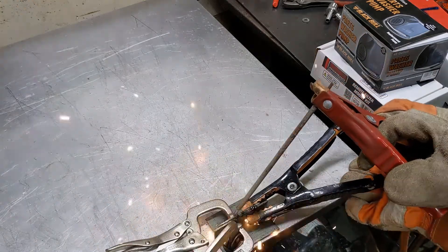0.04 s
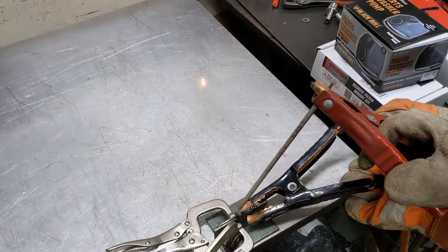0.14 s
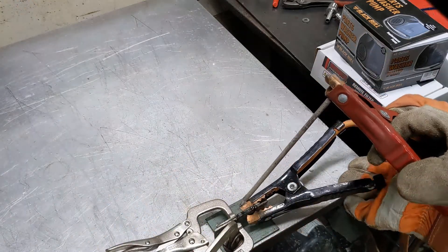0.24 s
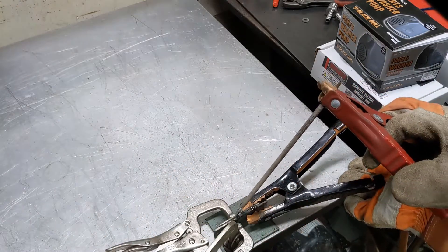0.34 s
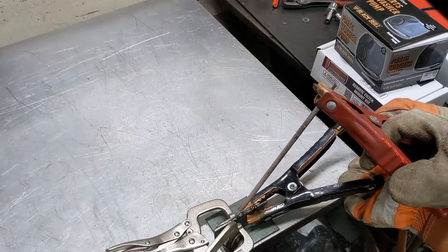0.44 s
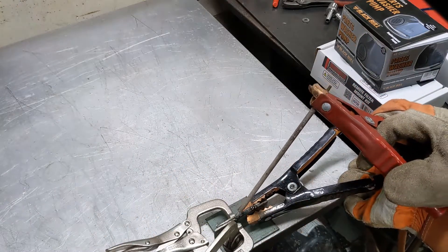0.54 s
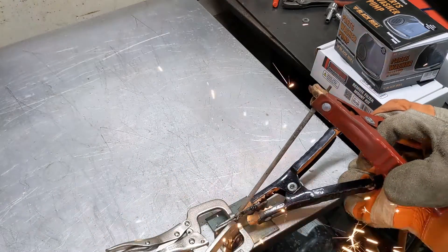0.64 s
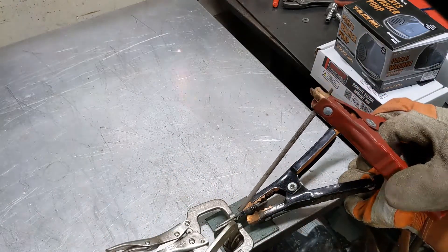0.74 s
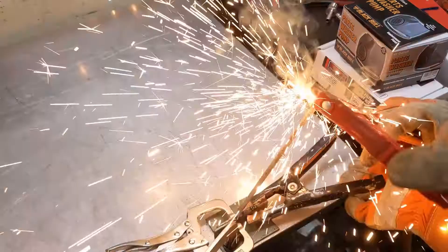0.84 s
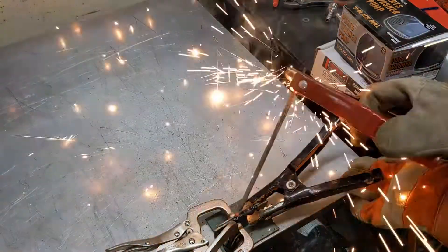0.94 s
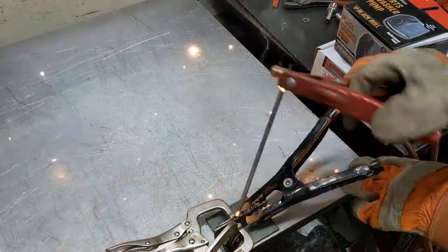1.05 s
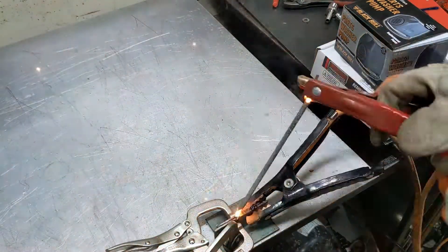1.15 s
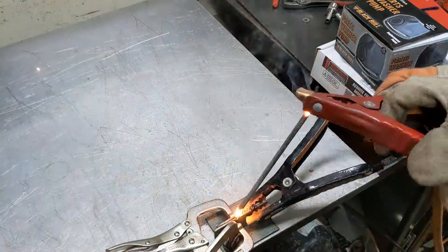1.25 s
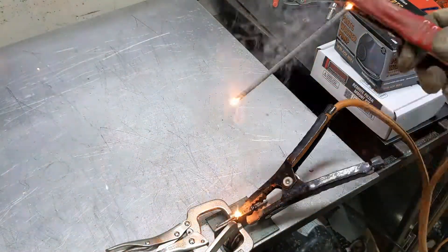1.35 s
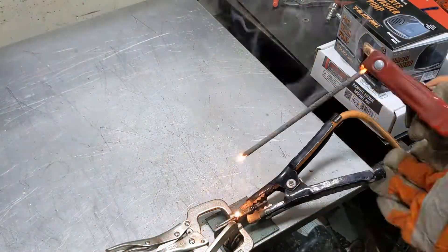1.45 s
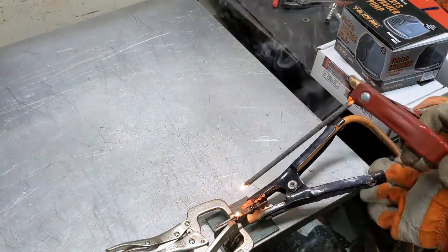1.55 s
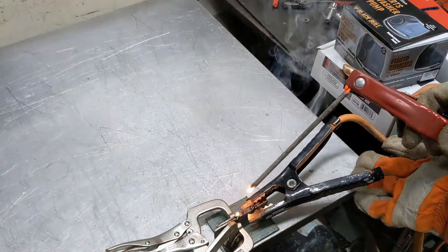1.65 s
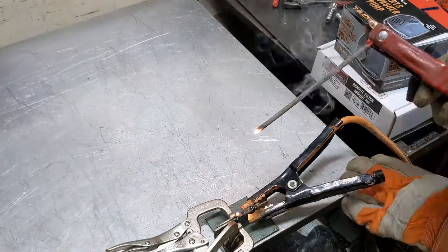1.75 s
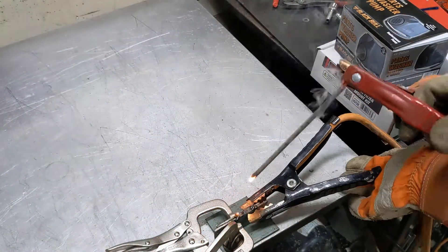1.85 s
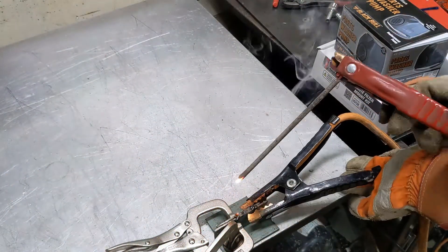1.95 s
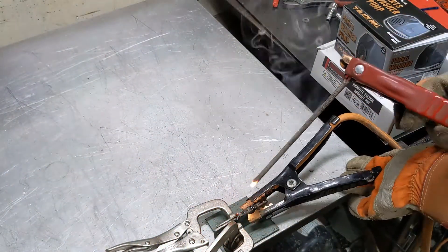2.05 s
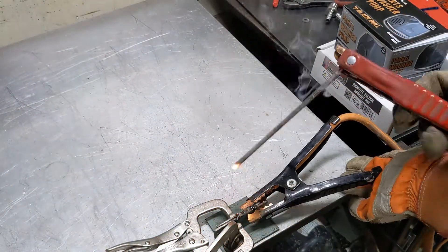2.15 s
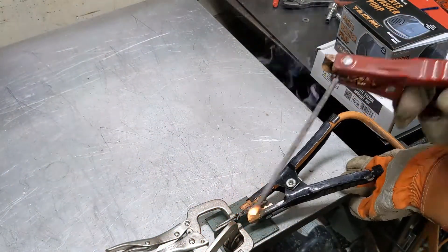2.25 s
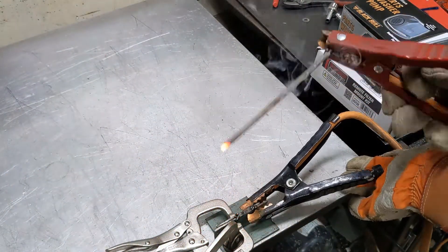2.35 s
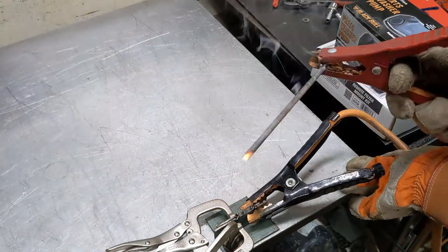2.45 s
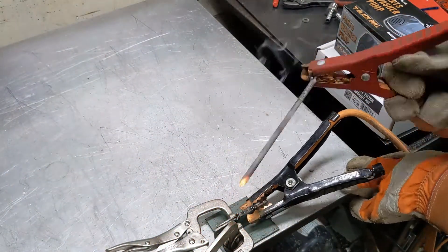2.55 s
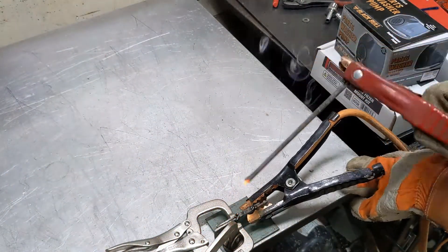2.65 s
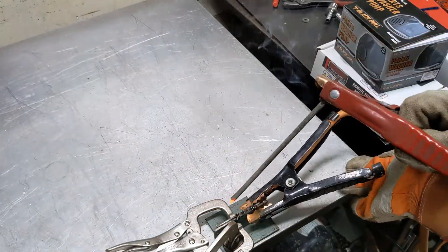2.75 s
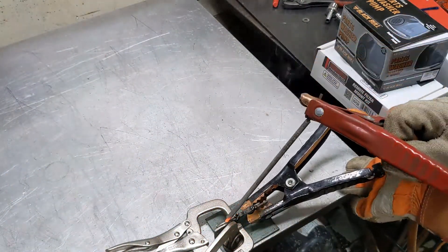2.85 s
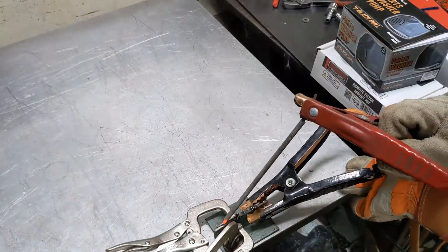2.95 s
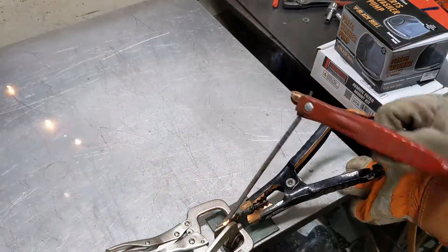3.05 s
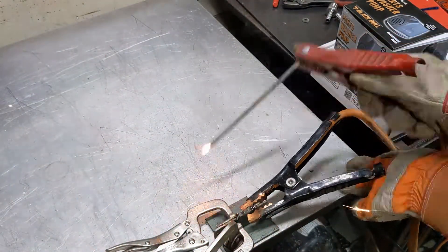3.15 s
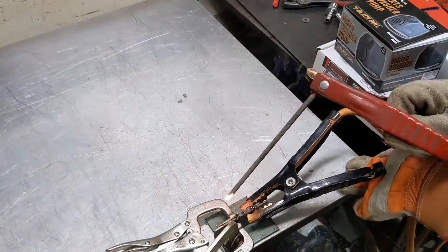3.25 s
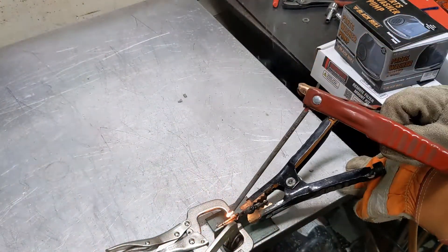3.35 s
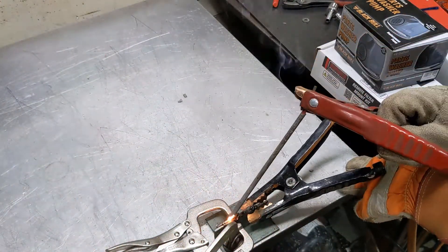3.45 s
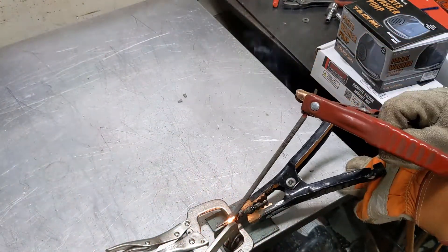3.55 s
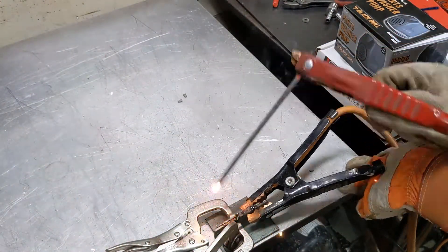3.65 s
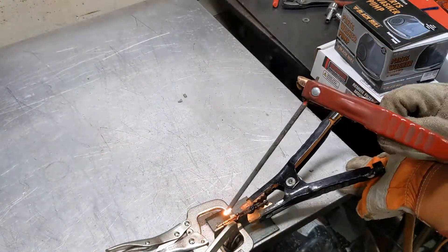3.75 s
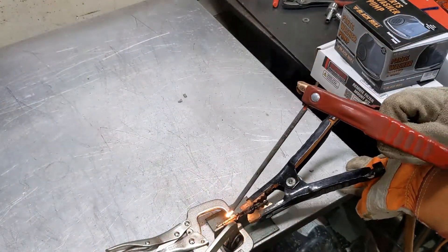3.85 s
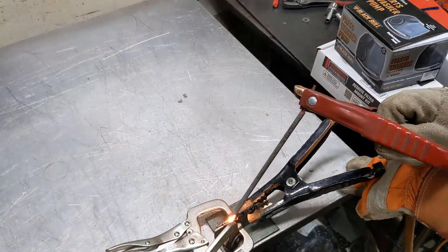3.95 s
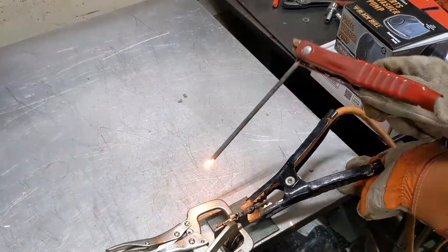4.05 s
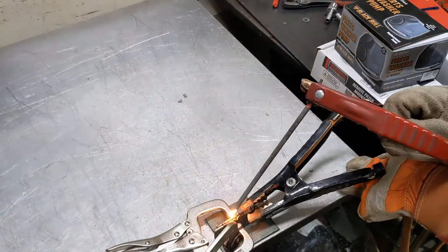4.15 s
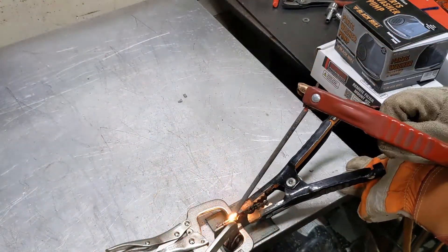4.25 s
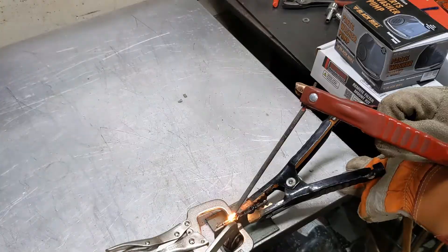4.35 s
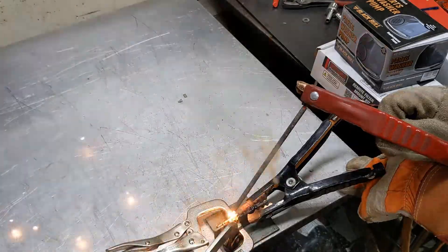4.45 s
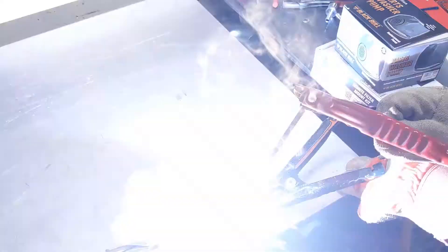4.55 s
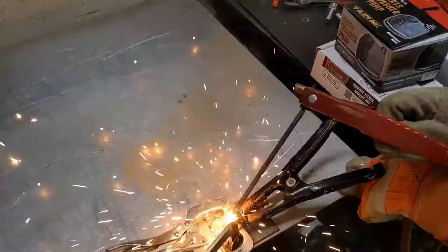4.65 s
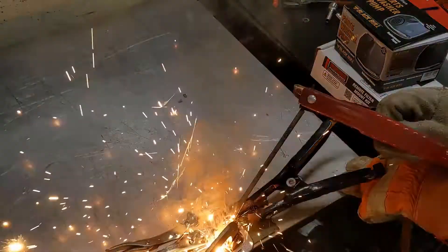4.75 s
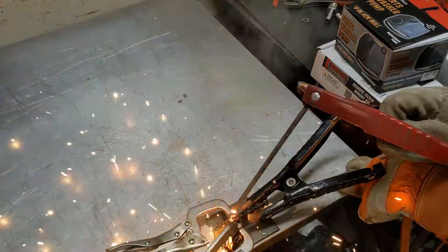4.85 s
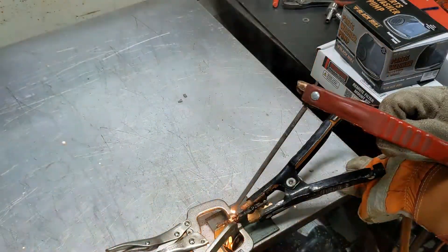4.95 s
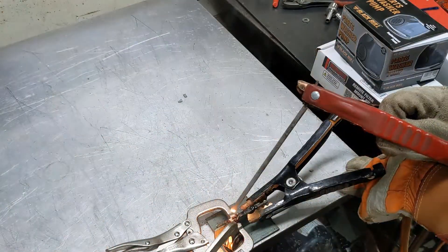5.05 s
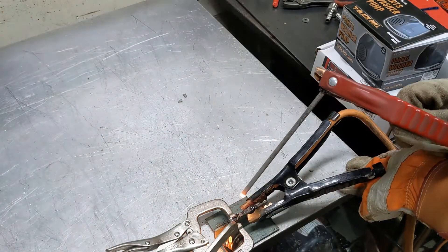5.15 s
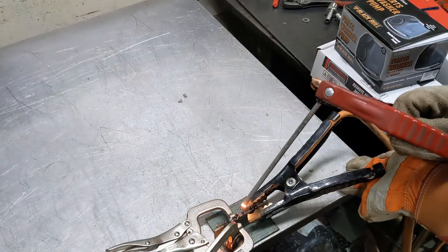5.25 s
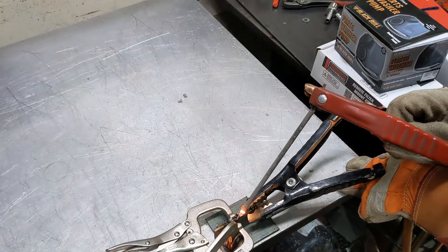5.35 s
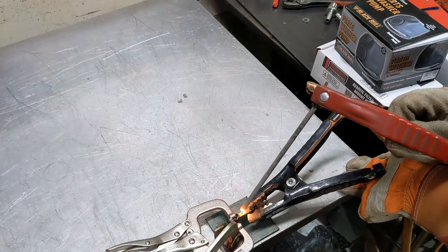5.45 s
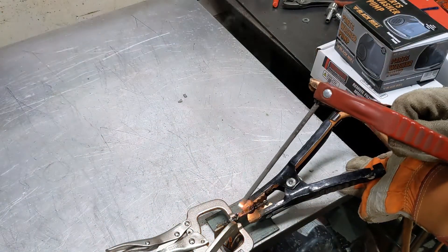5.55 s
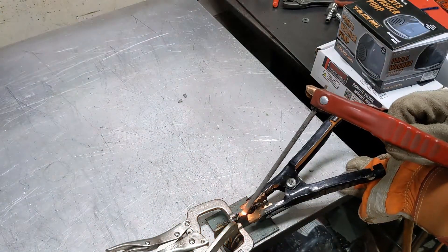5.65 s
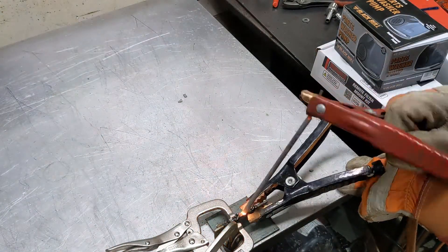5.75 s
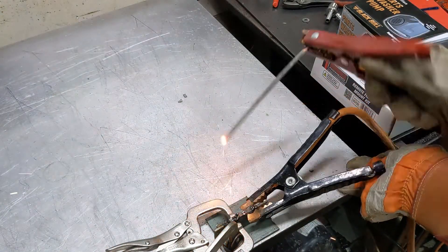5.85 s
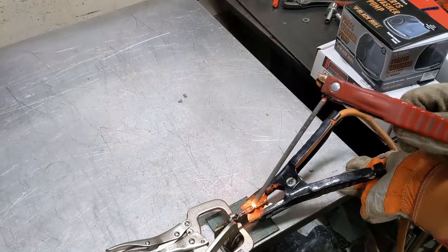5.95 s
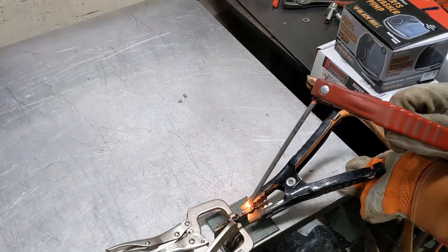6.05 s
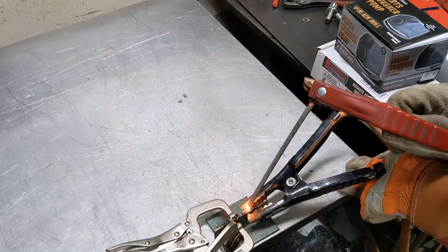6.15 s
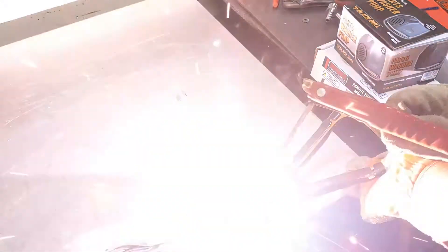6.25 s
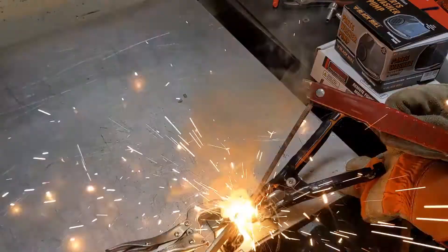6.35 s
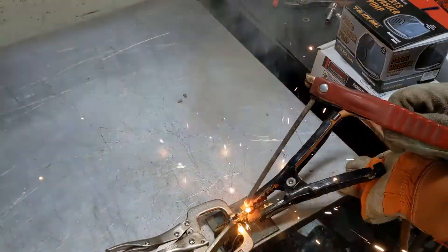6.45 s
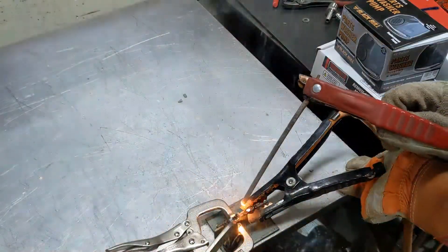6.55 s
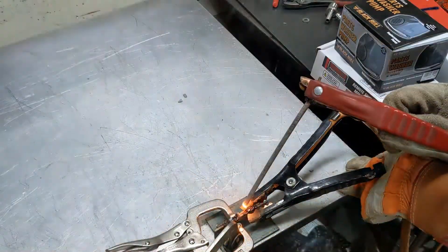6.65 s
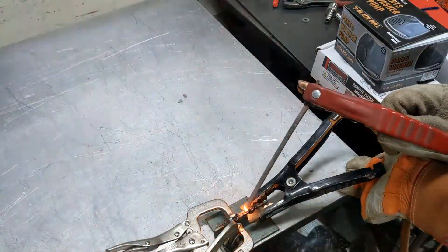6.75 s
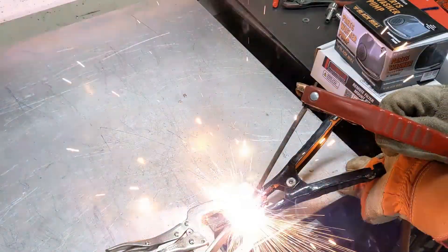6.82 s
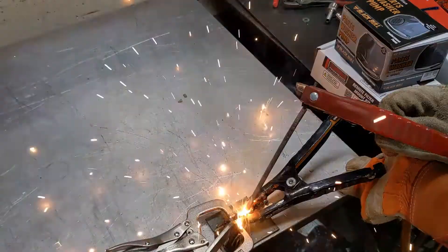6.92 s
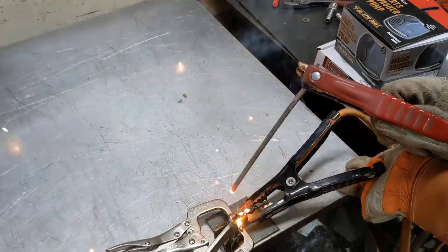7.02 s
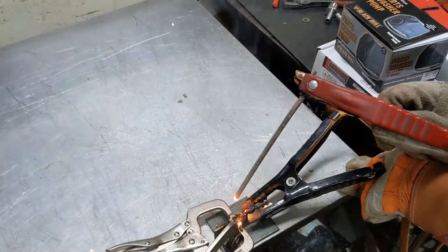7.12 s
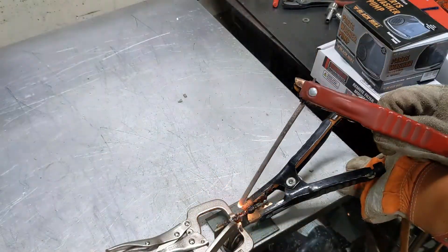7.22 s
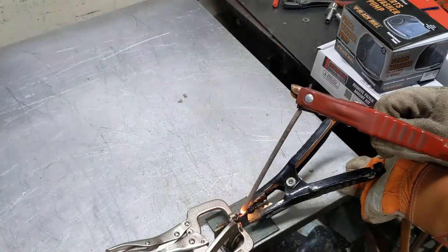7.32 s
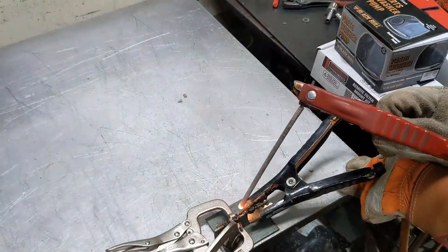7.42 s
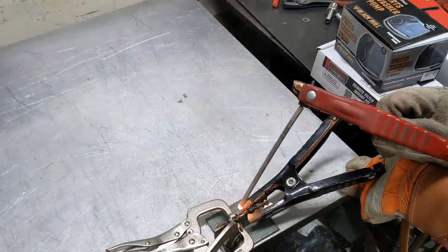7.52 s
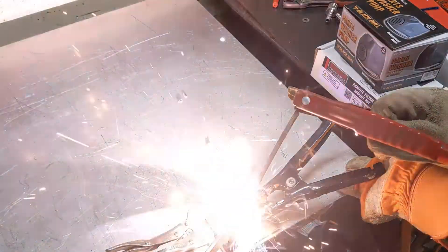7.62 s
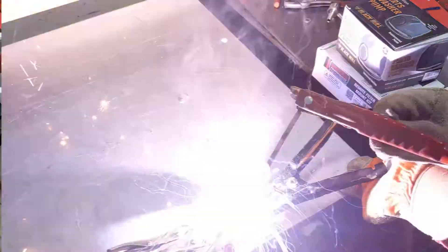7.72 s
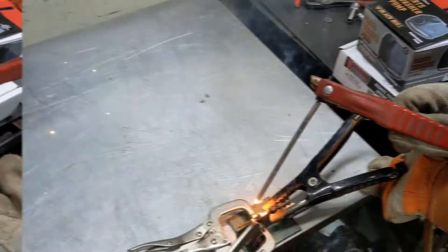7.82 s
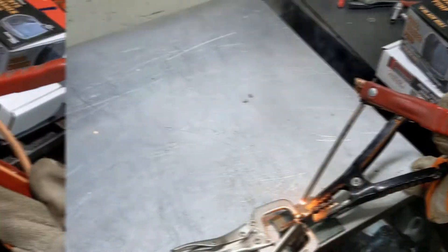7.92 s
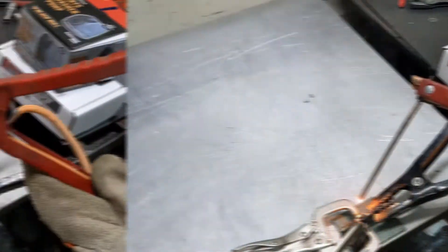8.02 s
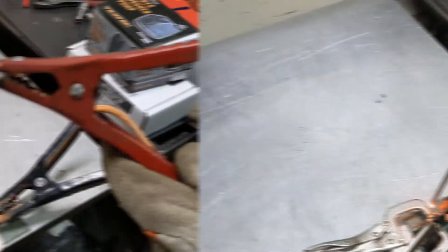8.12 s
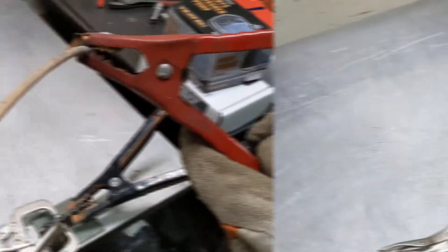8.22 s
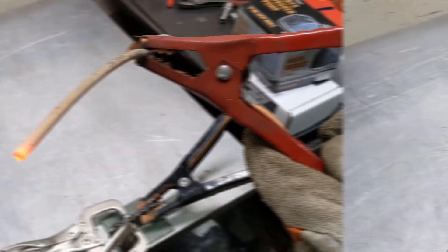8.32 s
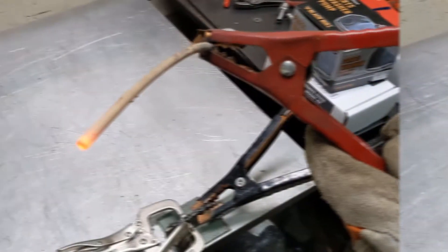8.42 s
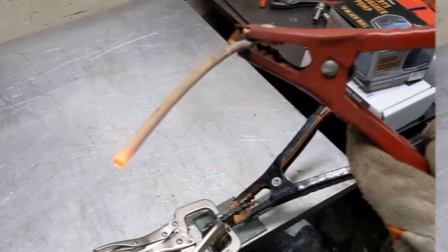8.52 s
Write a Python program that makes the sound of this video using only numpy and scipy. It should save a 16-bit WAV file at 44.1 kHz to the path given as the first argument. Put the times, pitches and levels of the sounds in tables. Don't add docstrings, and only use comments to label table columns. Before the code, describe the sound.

Close stereo pickup of a welding rod struck repeatedly on a clamped steel piece. Harsh dry cracks and brief hisses come in clusters, with air pops thumping the microphone, tiny spatter ticks, faint metallic rings and glove rubs. Quiet gaps reveal a fan motor and transformer hum. The densest crackling comes past six and seven seconds, then a quick change to quiet low rumble.

```python
import sys
import numpy as np
from scipy import signal
from scipy.fft import rfft, irfft
from scipy.io import wavfile

SR = 44100
rng = np.random.default_rng(int(sys.argv[2]) if len(sys.argv) > 2 else 0)


def waveform_to_disk(signal):
    frames = np.transpose(np.atleast_2d(signal))
    scaled = np.clip(frames, -1, 1) * 32767
    samples = np.round(scaled).astype(np.int16)
    wavfile.write(sys.argv[1], SR, samples)


def makeup_ratio(level_db):
    decades = np.asarray(level_db, float) / 20
    return 10 ** decades


N = 378378
WIND_CUT_HZ = 173.5

# start_s, sizzle_db, decay_t60_s, left_minus_right_db, brightness_db
TOUCHES = [(0.0272, -38, 0.05, 3, 20), (0.205, -56, 0.033, -6, 14), (0.6679, -23, 0.052, 3, 5),
           (0.9296, -26, .053, 4, 4), (0.957, -36, 0.068, -2, 2), (0.9817, -27.5, 0.054, 8.5, 10),
           (1.2976, -27.5, 0.06, 3, 3.5), (3.0208, -29, 0.051, -2.5, 8), (3.177, -31.5, 0.044, 0.5, 3),
           (3.232, -39.5, 0.13, -4, 6.5), (3.5596, -35.5, 0.068, -1, -9), (3.6457, -31.5, .058, -1, 7.5),
           (3.98, -34, 0.066, -1.5, -0.5), (4.044, -39, 0.063, -2, 7), (4.6816, -25.5, 0.05, 4, 8),
           (5.415, -45, 0.067, -0.5, -4), (5.6352, -27.5, 0.042, -1, 10.5), (5.867, -30.5, 0.05, 1, 8),
           (7.7648, -31, 0.05, -1, -4)]
# start_s, left_height, right_height [full scale before trim]
POPS = [(0.0332, -0.01, -0.19), (0.0381, -0.02, 0.44), (0.0436, 0.5, -0.01), (0.0472, -0.05, -0.03),
        (0.2051, -0.08, 0.0), (0.3258, 0, -0.04), (0.8277, -0.048, -0.054), (0.8354, 0.07, -0.05),
        (0.8414, -0.08, 0.02), (0.8455, 0.07, 0.02), (0.8782, -0.18, -0.35), (0.9817, 0, 0.28),
        (4.4057, 0.01, 0.08), (4.4098, -0.06, -0.05), (4.4168, 0.31, -0.03), (4.6847, -0.24, -0.01),
        (4.7691, 0.11, -0.08), (1.2972, -0.03, -0.04), (4.9724, -0.044, 0), (5.0686, -0.006, -0.056),
        (6.2566, 0.03, 0.35), (6.2594, 0.11, 0.09), (6.2624, 0.34, -0.58), (6.307, 0.09, 0.05),
        (6.3142, -0.09, 0.04), (6.3706, 0.05, 0.06), (6.3524, -0.1, -0.03), (6.3574, 0.2, 0),
        (6.3889, 0.1, 0.04), (6.4947, -0.068, 0), (6.8296, 0.01, -0.16), (6.8377, -0.36, -0.25),
        (6.8637, -0.13, 0), (6.8841, 0, -0.08), (6.9204, -0.06, 0.09), (6.9084, 0.09, -0.03),
        (6.9397, -0.08, 0), (7.5876, 0.53, -0.06), (7.5923, 0.01, -0.15), (7.6333, 0.07, -0.03),
        (7.6407, 0.05, 0.09), (7.7091, 0.06, 0.42), (7.9121, -0.04, 0)]
# freq_hz, likeness [0..1]
LIKENESS = [(60, 0.28), (180, 0.89), (550, 0.94), (1650, 0.55), (4970, 0.067), (15000, 0.089)]


def rms_one(x):
    return x / np.sqrt(np.mean(x ** 2) + 1e-20)


def in_time(rows):
    s, *columns = np.transpose(rows)
    return [np.interp(np.arange(N) / SR, s, c) for c in columns]


def at_hz(points, hz):
    point_hz, value = np.array(points).T
    return np.interp(np.log(hz), np.log(point_hz), value)


def butter(x, hz, kind, order=2):
    sos = signal.butter(order, np.clip(hz, 10, .45 * SR), kind, fs=SR, output="sos")
    return signal.sosfilt(sos, x)


def drift(rate_hz):
    r = np.exp(-80 * np.pi * rate_hz / SR)
    slow = signal.lfilter([1], [1, -2 * r, r * r], rng.standard_normal(N // 40 + 2002))[2000:]
    return np.interp(np.arange(N) / 40, np.arange(len(slow)), rms_one(slow))


def coloured(spectrum):
    hz = np.maximum(np.fft.rfftfreq(N, 1 / SR), 1)
    mid, side = rfft(rng.standard_normal((2, N)))
    alike = np.clip(at_hz(LIKENESS, hz), 0, 1)
    both = np.sqrt(1 + alike) * mid + np.sqrt(1 - alike) * side * [[1], [-1]]
    return rms_one(irfft(both * makeup_ratio(at_hz(spectrum, hz)), N))


def strikes(rows, heights):
    out = np.full((2, N), 1e-18)
    index = np.round(np.array(rows)[:, 0] * SR).astype(int)
    np.add.at(out, (slice(None), index), heights.T)
    return out


def ring(clicks, hz, t60_s):
    r, w = makeup_ratio(-60 / (t60_s * SR)), 2 * np.pi * hz / SR
    return signal.lfilter([0, np.sin(w)], [1, -2 * r * np.cos(w), r * r], clicks)


def bursts():
    # start_s, sizzle_db, left_minus_right_db, brightness_db
    spits = [(0.033, -25, 2.5, 3), (0.8782, -22, 8, -1), (4.4166, -27, 0, -1.5), (4.658, -27, 1, 9),
             (6.302, -15, 5.5, 9), (6.327, -21.5, -18.5, 11), (6.3558, -17, -1.5, 5),
             (6.3888, -21.5, 6, 30), (6.885, -34, -12, 0), (7.6634, -17.5, -0.5, 16), (7.7091, -29, 5, 16)]
    # start_s, sizzle_db, burn_s, decay_t60_s, left_minus_right_db
    arcs = [(0.032, -36, 0.008, 0.084, 6), (0.826, -19.5, 0.025, 0.14, 2),
            (4.4035, -23, 0.0095, 0.062, -0.5), (4.574, -30, 0.016, 0.24, 1.5),
            (4.595, -27.5, .006, .04, -1.5), (4.617, -27.5, 0.016, .03, -0.5), (4.711, -32, 0.02, 0.35, 0),
            (4.74, -34.5, 0.032, .012, -6), (4.76, -25.5, 0.0077, 0.028, 9), (6.254, -27, 0.01, .021, 2.5),
            (6.271, -39.5, .02, .13, 6.5), (6.296, -29.5, 0.086, 0.08, -1),
            (6.306, -23.5, 0.025, 0.031, 10.5), (6.365, -34, 0.033, .012, -5),
            (6.829, -29.5, 0.011, .036, -4), (6.859, -36, 0.049, .089, 6.5), (6.897, -35, 0.051, .02, 1),
            (6.906, -29.5, 0.02, 0.11, 5), (7.585, -33.5, 0.015, .055, 3.5), (7.604, -32.5, 0.032, .056, 5),
            (7.62, -29, 0.016, .012, 5.5), (7.636, -27, 0.0096, .016, -7), (7.645, -30.5, 0.026, 0.14, 0.5)]
    # start_s, sizzle_db, burn_s
    sputters = [(0.064, -44, 0.017), (0.576, -37, .003), (0.9, -50, .008), (1.001, -37, 0.0097),
                (1.091, -53, .02), (1.189, -42.5, 0.022), (1.256, -43.5, .006), (1.367, -52.5, 0.015),
                (2.19, -55, 0.032), (2.095, -59, .02), (2.56, -58, .02), (2.8, -63, .03), (3.195, -50, .01),
                (6.46, -46, .004), (4.794, -55, 0.088), (4.891, -53.5, .12), (5.896, -57.5, 0.028),
                (6.504, -43, .002), (6.639, -50, .003), (6.812, -47, .06), (7.03, -56.5, .14),
                (7.485, -56.5, .01), (7.702, -36, .005), (7.731, -41, .006), (7.906, -53.5, .012)]
    touch_lead_s, touch_burn_s = .0008, .002
    spit_lead_s, spit_t60_s = .00087, .02
    return ([(s - touch_lead_s, db, touch_burn_s, t60, pan, bright) for s, db, t60, pan, bright in TOUCHES]
            + [(s - spit_lead_s, db, 0, spit_t60_s, pan, bright) for s, db, pan, bright in spits]
            + [(*arc, 7) for arc in arcs]
            + [(*weak, .07, .5, 4) for weak in sputters])


def sizzle(rise_s, tail_db, tail_t60_s, body_db, body_rule, thud_db):
    low, high, body = np.zeros((3, 2, N))
    after = np.arange(SR // 4) / SR
    for s, level_db, burn_s, t60_s, pan_db, bright_db in bursts():
        fading = np.maximum(after - burn_s, 0)
        power = makeup_ratio(-120 * fading / max(t60_s, .004)) + makeup_ratio(2 * tail_db - 120 * fading / tail_t60_s)
        power *= np.minimum(after / rise_s, 1)
        power = power * makeup_ratio(2 * level_db + pan_db * np.array([[1], [-1]]))
        start = round(s * SR)
        span = slice(start, start + SR // 4)
        high_share = 1 / (1 + makeup_ratio(-2 * bright_db))
        low[:, span] += power * (1 - high_share)
        high[:, span] += power * high_share
        body[:, span] += power * makeup_ratio(2 * (body_db + body_rule * min(level_db + 31, 0)))

    spark_height = makeup_ratio(4.0 * np.minimum(rng.exponential(1, (2, N)), 1.5))
    sparks = (rng.random((2, N)) < 1100 / SR) * spark_height
    grit = rng.standard_normal((3, 2, N)) * (1 + 1.3 * sparks) * makeup_ratio(2.1 * drift(200))
    low_hiss = rms_one(butter(grit[1], [1400, 5800], "band"))
    high_hiss = rms_one(butter(grit[2], 5600, "high"))
    thud = rms_one(butter(grit[1], [20, 110], "band"))
    bottom = rms_one(butter(grit[0], [230, 1500], "band")) + makeup_ratio(thud_db) * thud
    return np.sqrt(low) * low_hiss + np.sqrt(high) * high_hiss + np.sqrt(body) * bottom


def cracks(trim_db, splash_db, splash_t60_s):
    # start_s, left_peak_db, right_peak_db, ring_hz
    spikes = [(0.0268, -27, -31, 10900), (0.0331, -19, -11, 5400), (0.0355, -9, -13, 12100),
              (0.0369, -11, -22, 11400), (0.038, -4, -8, 11900), (0.5787, -28, -33, 11400),
              (0.6657, -28, -30, 10900), (0.667, -22, -30, 10300), (0.6682, -4, -9, 11400),
              (0.8262, -23, -19, 6100), (0.8275, -8, -9, 7500), (0.8318, -7, -14, 10100),
              (0.8349, -9, -13, 9400), (0.8384, -10, -12, 8400), (0.8397, -11, -21, 8000),
              (0.8416, -7, -13, 9100), (0.8452, -12, -23, 7700), (0.8464, -9, -20, 11100),
              (0.852, -7, -16, 9000), (0.8644, -12, -23, 11100), (0.8697, -14, -16, 6300),
              (0.8719, -17, -26, 9700), (0.8782, -7, -9, 8300), (0.8832, -8, -12, 10700),
              (0.9294, -5, -13, 10500), (0.9306, -16, -20, 12800), (0.9573, -19, -24, 12800),
              (0.9802, -16, -29, 9300), (0.9817, -3, -11, 12700), (0.9838, -17, -21, 11100),
              (1.0045, -22, -30, 11800), (1.2972, -10, -13, 9900), (1.2983, -18, -19, 6400),
              (1.3, -16, -24, 8500), (3.0203, -21, -16, 8500), (3.0217, -17, -18, 8500),
              (3.1768, -23, -19, 8100), (3.1786, -28, -23, 11700), (3.2317, -31, -26, 5300),
              (3.5594, -23, -24, 7700), (3.6454, -16, -21, 11000), (3.6478, -29, -23, 10200),
              (3.9798, -23, -23, 8100),
              (4.4017, -23, -31, 6700), (4.4043, -24, -14, 11500), (4.4078, -10, -8, 8100),
              (4.4167, -7, -9, 7700), (4.5755, -16, -21, 7200), (4.6285, -18, -21, 10400),
              (4.6578, -28, -28, 10600), (4.6594, -25, -24, 8300), (4.6788, -27, -31, 11000),
              (4.68, -18, -24, 13300), (4.6812, -16, -13, 10400), (4.6845, -8, -13, 10000),
              (4.7693, -5, -11, 9000), (4.7717, -18, -27, 8200), (5.6351, -13, -11, 8500),
              (5.6368, -31, -21, 9000), (5.867, -11, -15, 10800), (5.8681, -24, -20, 7800),
              (6.2565, -14, -9, 6500), (6.2593, -11, -12, 11300), (6.2624, -10, -6, 4400),
              (6.2657, -17, -23, 6700), (6.2749, -16, -29, 10500), (6.3012, -10, -15, 11300),
              (6.3031, -10, -12, 6300), (6.3097, -8, -18, 6200), (6.3147, -7, -13, 6600),
              (6.32, -7, -15, 11100), (6.3222, -7, -12, 5900), (6.3268, -5, -16, 10900),
              (6.3332, -11, -18, 11300), (6.3522, -10, -16, 10200), (6.3556, -9, -14, 11900),
              (6.3573, -7, -10, 5700), (6.3721, -13, -19, 10800), (6.3891, -13, -8, 7400),
              (6.8308, -23, -16, 8000), (6.8328, -18, -14, 6600), (6.8376, -1, -5, 9500),
            (6.8398, -27, -17, 9500), (6.8637, -10, -21, 9100), (6.8999, -24, -26, 5500),
            (6.9083, -4, -17, 8200), (6.921, -8, -11, 10000), (6.9334, -19, -21, 9400),
            (6.9396, -14, -17, 9800), (7.5861, -22, -19, 9400), (7.5877, -7, -13, 4000),
            (7.5894, -3, -9, 9100), (7.5923, -5, -13, 8900), (7.5976, -3, -18, 10400),
            (7.608, -2, -14, 11600), (7.6144, -11, -21, 11200), (7.6207, -11, -27, 9700),
            (7.6221, -5, -15, 10500), (7.629, -11, -23, 10900), (7.6333, -5, -19, 5900),
            (7.6404, -8, -14, 10800), (7.6541, -9, -12, 10100), (7.6631, -8, -13, 10400),
            (7.6651, -9, -15, 7700), (7.7049, -24, -31, 9700), (7.7061, -26, -29, 9200),
            (7.7091, -4, -7, 11400), (7.7635, -18, -24, 11000), (7.7656, -20, -21, 4900),
            (7.7674, -19, -26, 10900)]
    right_lead_s = .00007
    rows = spikes
    out, size = np.zeros((2, N)), SR // 100
    after, pushes = np.arange(size) / SR, np.array(POPS)
    click = butter(1.0 * (after == 0), 3200, "high")
    hiss = butter(rng.standard_normal((len(rows), 2, size)), 1400, "high")
    for (s, left_db, right_db, hz), scatter in zip(rows, hiss):
        r, w = .7, 2 * np.pi * hz / SR
        rung = signal.lfilter([1], [1, -2 * r * np.cos(w), r * r], click)
        near = pushes[np.abs(pushes[:, 0] - s).argmin()]
        signs = np.where((abs(near[0] - s) < .0005) & (near[1:] < -.02), -1, 1)
        splash = makeup_ratio(splash_db - 60 * after / splash_t60_s) * scatter
        crack = signs[:, None] * rung / rung.max() + splash
        for side, (start_s, db) in enumerate([(s, left_db), (s - right_lead_s, right_db)]):
            start = round(start_s * SR)
            out[side, start:start + size] += makeup_ratio(db + trim_db) * crack[side]
    return out


def pops(width_hz, leak_db):
    touch_push = -.045
    rows = POPS + [(s, touch_push * makeup_ratio(db + 27) / 2, touch_push * makeup_ratio(db + 24)) for s, db, *_ in TOUCHES]
    push = strikes(rows, np.array(rows)[:, 1:] * makeup_ratio(26.5))
    push = butter(push, width_hz, "low", order=1)
    push = butter(push, 8000, "low", order=1)
    return butter(push, WIND_CUT_HZ, "high", order=6) + makeup_ratio(leak_db) * butter(push, 160.7, "low")


def beads():
    # start_s, peak_db, centre_hz
    ticks = [(0.3249, -46, 2700), (0.47, -50, 5500), (0.81, -44, 10500), (1.047, -39, 2950),
             (1.1144, -50, 3110), (1.916, -56, 3710), (1.949, -33, 11300), (1.97, -46, 11000),
             (2.0997, -48, 5400), (2.29, -46, 12000), (2.4604, -47, 5000), (2.5637, -46, 4300),
             (2.578, -47, 12000), (5.81, -48, 4000), (5.849, -43, 11000), (6.462, -38, 4000),
             (2.03, -44, 12800), (2.1292, -43, 4100), (2.14, -44, 4310), (2.16, -34, 11100),
             (2.1999, -41.5, 3000), (2.4059, -48, 3700), (2.4214, -33, 4400), (2.603, -40, 4200),
             (2.6507, -35, 5000), (2.6792, -37, 6850), (3.1994, -36, 2780), (4.9252, -41, 2600),
             (4.9697, -47, 3800), (5.0674, -46, 3000), (5.1018, -43, 4050), (5.7044, -50, 13000),
             (5.7623, -43, 10800), (5.7813, -45, 10800), (5.8286, -40, 10800), (5.8965, -32, 10700),
             (7.938, -50, 4080)]
    slag_start_s, slag_end_s, slag_per_s, slag_db = 1.85, 2.6, 16, -57
    when, size, pitch = rng.random((40, 3)).T
    s = slag_start_s + (np.arange(len(when)) + when) / slag_per_s
    slag = zip(s, slag_db + 9 * size, 3500 * 3.5 ** pitch)
    return ticks + [row for row in slag if row[0] < slag_end_s]


def spatter(trim_db, t60_s, octaves):
    out, size = np.zeros((2, N)), SR // 50
    after = np.arange(size) / SR
    rows = beads()
    hiss = rng.standard_normal((len(rows), 2, size))
    for (s, peak_db, hz), (shared, own) in zip(rows, hiss):
        puff = (shared + 0.71 * own * np.array([[1], [-1]])) * makeup_ratio(-60 * after / t60_s)
        bottom_hz = hz * 2 ** -min(octaves, 2200 / hz)
        top_hz = hz * 2 ** min(octaves, 4000 / hz)
        tick = butter(puff, [bottom_hz, top_hz], "band") + .12 * butter(puff, 1500, "high")
        start = round(s * SR)
        out[:, start:start + size] += makeup_ratio(peak_db + trim_db) * tick / np.abs(tick).max()
    return out


def taps():
    # start_s, level_db, mode_hz, t60_s
    hits = [(0.579, -40.5, 3010, 0.067), (1.008, -40.5, 2580, 0.084), (1.012, -43.5, 946, 0.16),
            (1.313, -40.5, 1404, 0.05), (3.018, -44, 1424, 0.11), (3.562, -41.5, 1370, 0.062),
            (3.563, -50, 2580, 0.11), (3.559, -39, 4020, 0.055), (3.98, -45, 1394, 0.064),
            (0.58, -44, 5200, 0.04), (5.867, -36, 5100, 0.02), (3.98, -44, 4000, 0.03)]
    neighbours = [(1, 0, 1), (.36, -5, .6), (.62, -6, .7), (1.23, -6, .8)]   # hz_ratio, level_db, t60_ratio
    out = np.zeros((2, N))
    for s, db, hz, t60_s in hits:
        for ratio, weaker_db, shorter in neighbours:
            heights = makeup_ratio(db + weaker_db + np.array([[0.85, -1.0]]))
            out += ring(strikes([(s,)], heights), hz * ratio, t60_s * shorter)
    return out


def rustle():
    # middle_s, level_db, length_s
    rubs = [
        (1.55, -64.5, 0.34),
        (2.764, -60.5, 0.2),
        (3.152, -58, 0.31),
        (3.812, -64.5, 0.24),
        (4.17, -62.5, 0.16),
        (5.894, -55, 0.14),
        (6.038, -69, .1),
        (7.097, -66, 0.41),
        (7.888, -59, 0.16),
    ]
    now = np.arange(N) / SR
    swell = sum(makeup_ratio(db) * np.cos(np.pi * np.clip((now - s) / length_s, -.5, .5)) for s, db, length_s in rubs)
    hiss = rms_one(butter(coloured(LIKENESS), [1250, 2300], "band", order=3))
    return swell * makeup_ratio(2.0 * drift(30)) * hiss


def fan_motor():
    # multiple, rms_db
    orders = [(2, -78), (3, -62), (6, -67), (7, -70.5), (9, -64.5), (11, -101), (12, -99), (15, -76),
              (16, -76.5)]
    turn = 2 * np.pi * np.cumsum(73.2 * (1 + 0.00208 * drift(1.32))) / SR
    return sum(makeup_ratio(db + 1.5 + 1.5 * drift(5)) * np.sin(k * turn + rng.uniform(0, 2 * np.pi)) for k, db in orders)


def transformer():
    # line_hz, rms_db
    lines = [(480, -60.5), (566, -81), (706, -73), (1441, -77), (1921, -82.5), (2401, -79), (2880, -91.5)]
    now = np.arange(N) / SR
    return sum(makeup_ratio(db + 3.5 + 1.5 * drift(9.2)) * np.sin(2 * np.pi * hz * now) for hz, db in lines)


def cooling_fizz():
    # time_s, level_db
    level = [(0.0, -57), (0.48, -66), (1.09, -58), (1.43, -61), (4.44, -65), (4.78, -54), (5.17, -64),
             (6.29, -64), (6.38, -59.5), (7.58, -65), (7.74, -56.5), (7.98, -63), (8.18, -64.5)]
    # freq_hz, density_db [dB per Hz]
    colour = [(100, -14.5), (170, -10.5), (1180, -10.5), (2000, -11.5), (4010, -7.5), (6140, -11),
              (9330, -9.5), (16000, -16)]
    return makeup_ratio(in_time(level)[0] + 1.5 * drift(34) + 0.58 * drift(180)) * coloured(colour)


def workshop():
    # freq_hz, density_db [dB per Hz]
    air_colour = [(24, -68.5), (40, -45), (92, -49.5), (166, -24), (209, -9.5), (338, -12.5), (482, -9),
                  (546, -12), (779, -15.5), (2800, -30), (3640, -55), (6160, -120)]
    air = makeup_ratio(-56.5 + 1.1 * drift(5.1)) * coloured(air_colour)
    whine = makeup_ratio(-82.5) * rms_one(butter(rng.standard_normal((2, N)), [9100, 9500], "band"))
    return air + fan_motor() + transformer() + cooling_fizz() + whine + rustle()


def second_place():
    # time_s, low_db, upper_db
    level = [
        (8.17, -51, -65),
        (8.214, -51, -71),
        (8.58, -52, -71),
    ]
    # freq_hz, density_db [dB per Hz]
    colour = [(12, -52), (20, -36), (120, -22), (172, -22), (204, -24), (328, -19), (499, -16), (873, -34),
              (1860, -42), (2320, -40), (3950, -46.5), (6360, -47.5), (11000, -55), (16000, -57)]
    # centre_hz, width_hz, level_db
    drone_bands = [(54.6, 14, -64.5), (120.2, 9.8, -66), (164, 10, -66)]
    beat_db, beat_hz, beats_per_s, beat_top_s = -58, 120.5, 7.2, 8.215
    low_db, upper_db = in_time(level)
    air = coloured(colour)
    drones = 0
    for hz, wide_hz, db in drone_bands:
        band = butter(rng.standard_normal(N), [hz - wide_hz / 2, hz + wide_hz / 2], "band")
        drones = drones + makeup_ratio(db + 54) * rms_one(band)
    now = np.arange(N) / SR
    swell = 1 + .7 * np.cos(2 * np.pi * beats_per_s * (now - beat_top_s))
    drones = drones + makeup_ratio(beat_db + 54) * swell * np.sin(2 * np.pi * beat_hz * now)
    low = drones + makeup_ratio(1.0) * butter(air, 436, "low")
    return makeup_ratio(low_db) * low + makeup_ratio(upper_db + 18.5) * butter(air, 450, "high")


def scene():
    arc = sizzle(rise_s=0.00065, tail_db=-32, tail_t60_s=0.7, body_db=-12, body_rule=0.784, thud_db=-11.0)
    arc = arc + cracks(trim_db=2.5, splash_db=-25, splash_t60_s=.006)
    arc = arc + pops(width_hz=1000, leak_db=-24)
    arc = arc + spatter(trim_db=-0.5, t60_s=0.017, octaves=0.72)
    arc = arc + makeup_ratio(3.43 * drift(110)) * butter(taps(), WIND_CUT_HZ, "high")
    move_s, fade_s = 8.185, .015
    moved = np.clip((np.arange(N) / SR - move_s) / fade_s + .5, 0, 1)
    return (arc + workshop()) * (1 - moved) + second_place() * moved


def roll_off(x):
    return signal.sosfilt(signal.butter(12, 16990, fs=SR, output="sos"), x)


def record(dry):
    loud = np.clip(dry, -1, 1)
    cut = signal.sosfilt(signal.cheby2(16, 60, 16200, fs=SR, output="sos"), loud)
    peaks = loud * np.minimum(loud ** 4 / .004, 1)
    top = signal.sosfilt(signal.cheby2(10, 70, [15300, 17200], "band", fs=SR, output="sos"), peaks)
    mix = np.clip(cut + makeup_ratio(-24.5) * top, -.97, .97)
    return roll_off(mix)


dry = scene()
out = record(dry)
waveform_to_disk(out)
```